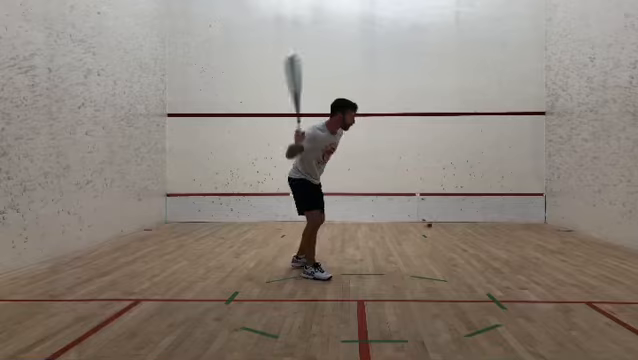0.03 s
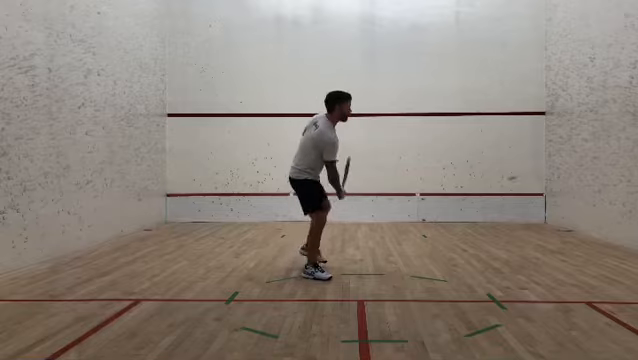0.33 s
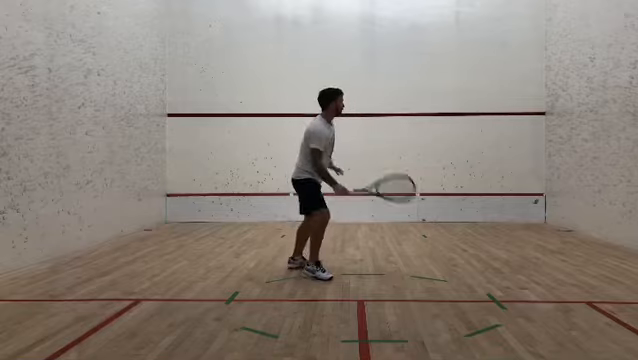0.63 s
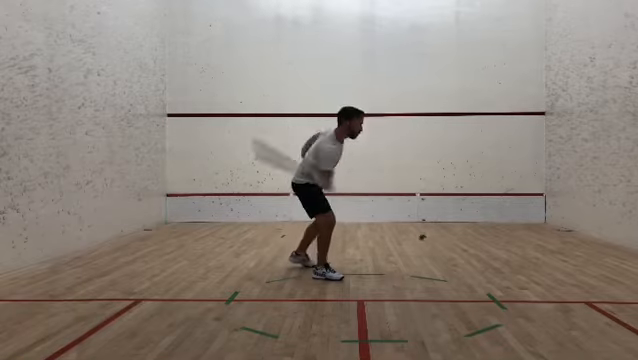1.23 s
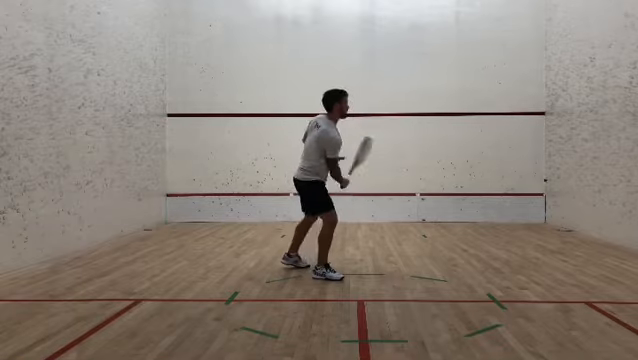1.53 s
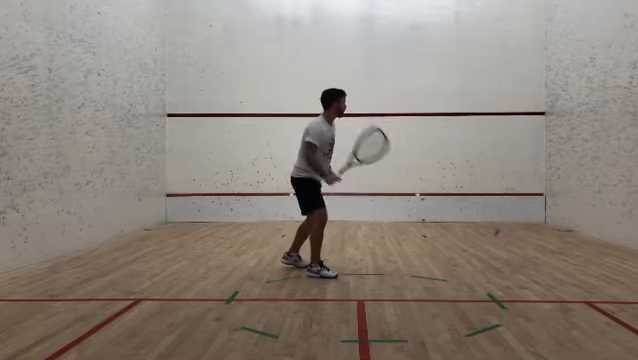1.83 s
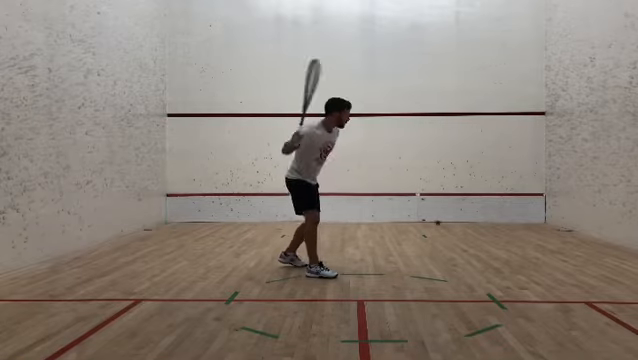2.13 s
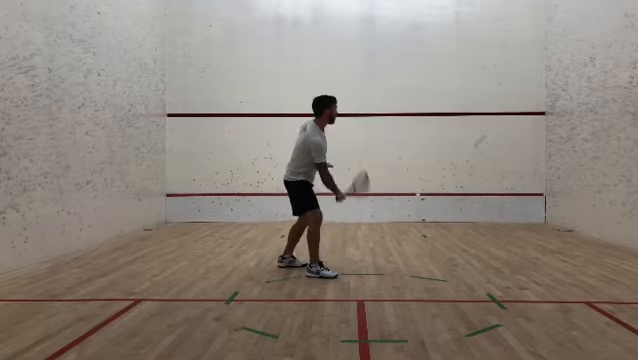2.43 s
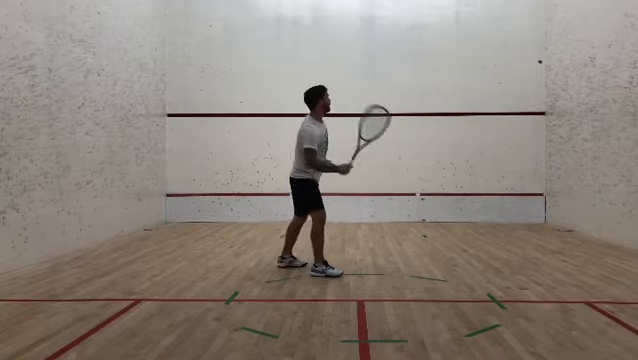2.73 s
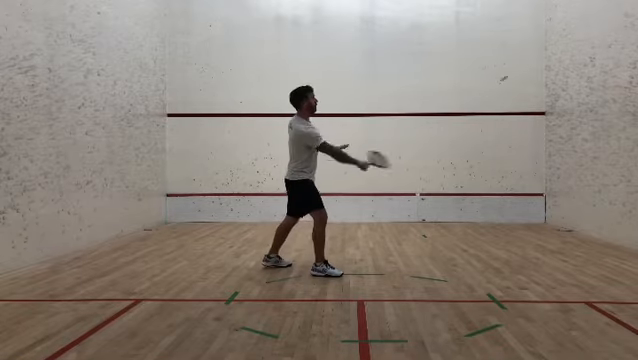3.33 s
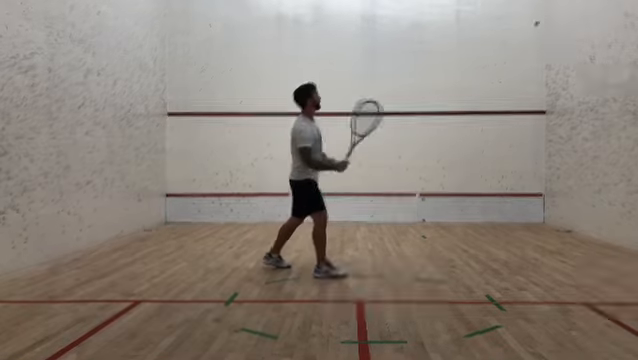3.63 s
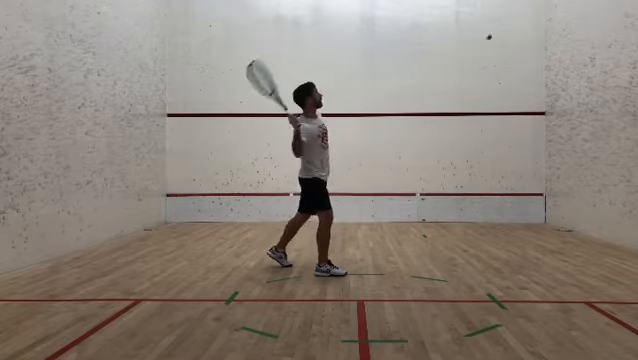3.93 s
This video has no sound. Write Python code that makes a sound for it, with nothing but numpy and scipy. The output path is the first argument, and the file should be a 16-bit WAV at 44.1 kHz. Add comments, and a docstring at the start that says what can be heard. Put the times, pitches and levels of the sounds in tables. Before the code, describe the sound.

A squash ball is struck and slaps the wall about once a second, echoing loudly.

```python
"""Solo squash in a bare court

Heard from the back, the strings crack against the hollow ball and ring briefly. About a sixth of a
second later the ball slaps the front wall. Hard side walls and ceiling throw back echoes that thicken
into a long, darkening tail. The springy floor thuds between strokes, over a low ventilation rumble."""
import sys
import numpy as np
from scipy import signal
from scipy.fft import rfft, irfft
from scipy.io import wavfile

SR = 44100
rng = np.random.default_rng(int(sys.argv[2]) if len(sys.argv) > 2 else 0)


def generate_wav(sig):
    """Save sig (samples, or channels by samples) to the path in sys.argv[1] as 16-bit PCM at SR."""
    pcm = np.round(np.clip(np.atleast_2d(sig).T, -1, 1) * 32767).astype(np.int16)
    wavfile.write(sys.argv[1], SR, pcm)


N = 176400
GAP_S = .004  # wait before a stroke or thud starts to ring on

# racket strokes: t/s, level/dB, treble/dB, string ring/dB
STROKES = [(.0493, .8, -.7, 0), (1.1534, .7, -1, 6), (2.1973, -2, .6, -3), (3.0833, -1.7, 1.6, 3),
           (3.9953, -.5, 0, 0)]
# tone of the crack: f/Hz, level/dB
CRACK_TONE = [(30, -30), (150, -12), (500, -9), (1500, -6), (2500, -6), (4200, -2), (7000, -1), (10000, -4),
              (15000, -14)]
# notes of the strings: f/Hz, level/dB, time to fade 60 dB/s
STRING_NOTES = [(1020, 0, .8), (1125, -2, .4), (1285, -6, .3), (1610, -3, .35), (4250, -17, .25)]
# first echoes of a stroke: delay/s, level/dB
RACKET_ECHOES = [(.0102, -8), (.0119, -5), (.0295, -9), (.0345, -9), (.046, -12)]
# tone of the court's answer to a stroke: f/Hz, level/dB
RACKET_TAIL = [(30, -44), (58, -14), (120, -10.5), (220, -7), (380, -5), (560, -7.5), (820, -5.5),
               (1020, -1), (1250, -9.5), (1550, -6), (1950, -16), (3600, -18.3), (7500, -22.3),
               (10500, -26.5), (15000, -37)]


def racket(level_db=-6.5, pock_hz=860, scatter=.13):
    """The strings crack and ring on, and the hollow ball goes 'pock'. Each echo sounds a bit different."""
    out, t, ring_t = np.zeros(N), clock(.03), clock(.6)
    for s, db, treble_db, ring_db in STROKES:
        for delay, echo_db in [(0, 0)] + RACKET_ECHOES:
            crack = amp(treble_db - 9) * noise(CRACK_TONE, t) * swell(t, peak_s=.0014, sharp=1.1)
            detune = np.exp(scatter * rng.normal())
            pock = amp(1.5) * sine(pock_hz * detune, t) * swell(t, peak_s=.004, sharp=11)
            push = push_of_air(t, at_s=.0045, width_s=.00055, db=-5)
            add(out, s + delay, amp(level_db + db + echo_db) * (crack + pock + push))
        ring = sum(amp(note_db + rng.normal(0, 2) - 60 * ring_t / fade_s) * sine(hz, ring_t)
                   for hz, note_db, fade_s in STRING_NOTES)
        add(out, s + GAP_S, amp(db + ring_db - 26) * ring)
        add(out, s + GAP_S, amp(db) * court_tail(shaded(RACKET_TAIL, treble_db, boom_db=0)))
    return out


# wall hits (the first leaves only its tail):
# t/s, level/dB, treble/dB, knock f/Hz, pop f/Hz, pop/dB, court boom/dB
WALL_HITS = [(-.85, -1, 0, 1900, 740, 0, 0), (.1993, .5, .3, 2000, 740, -5, .5),
             (1.3052, .7, -.8, 1900, 790, -2, 1.8), (2.3599, -1, .6, 1700, 780, 1, -1.5),
             (3.2543, -1.5, 1.1, 1480, 730, -2, -1)]
# tone of the slap: f/Hz, level/dB
SLAP_TONE = [(30, -30), (150, -10), (400, -2), (1000, -3), (1600, 5), (2900, 4.5), (4000, 0), (5500, -1),
             (9000, -4), (15000, -14)]
# first echoes of a wall hit: delay/s, level/dB
WALL_ECHOES = [(.0095, -10), (.0118, -2), (.0265, -7), (.0565, -6.5), (.0605, -4.5), (.116, -11)]
# tone of the court's answer to a wall hit: f/Hz, level/dB
WALL_TAIL = [(45, -42), (120, -14.3), (220, -5.3), (290, -5.5), (380, -2), (490, -2.5), (610, -6), (720, 2),
             (860, 2), (1020, -8), (1200, -12.3), (1470, -4), (1700, -6.2), (1950, -5.7), (2600, -12.3),
             (3600, -15.3), (5200, -16), (7500, -17.7), (10500, -20), (13000, -24), (16000, -33)]


def front_wall(level_db=-5.5, direct_db=1.8, scatter=.1, tail_gap_s=.008):
    """The ball slaps and knocks as it is squashed flat, then gives a lower pop as it springs back."""
    out, t = np.zeros(N), clock(.03)
    for s, db, treble_db, knock_hz, pop_hz, pop_db, boom_db in WALL_HITS:
        for delay, echo_db in [(0, direct_db)] + WALL_ECHOES:
            slap = amp(treble_db - 4.8) * noise(SLAP_TONE, t) * swell(t, peak_s=.0006, sharp=.55)
            detune = np.exp(scatter * rng.normal())
            knock = amp(-1) * sine(knock_hz * detune, t) * swell(t, peak_s=.0011, sharp=1.6)
            pop = sine(pop_hz * detune, t) * swell(t, peak_s=.0035, sharp=4)
            pop += push_of_air(t, at_s=.003, width_s=.00045, db=-6)
            add(out, s + delay, amp(level_db + db + echo_db) * (slap + knock + amp(pop_db) * pop))
        add(out, s + tail_gap_s, amp(db) * court_tail(shaded(WALL_TAIL, treble_db, boom_db)))
    return out


def push_of_air(t, at_s, width_s, db):
    """One swing of air pressure from the ball being flattened."""
    u = (t - at_s) / width_s
    return amp(db) * u * np.exp(-u * u / 2)


# thuds on the floor: t/s, level/dB, tick/dB
THUDS = [(.648, -4, -15), (1.765, -8, -40), (2.775, -11, -40), (3.455, -6, -40)]
# tone of the floorboards: f/Hz, level/dB
BOARD_TONE = [(25, -25), (55, -2), (110, 0), (180, -8), (400, -16), (1500, -30), (8000, -60)]


def floor_thuds(level_db=-18, tail_db=-9):
    """Ball and feet thump the springy boards, with a faint tick as they land."""
    out, t = np.zeros(N), clock(.2)
    for s, db, tick_db in THUDS:
        boards = amp(-10) * noise(BOARD_TONE, t) * swell(t, peak_s=.012, sharp=1.1)
        tick = amp(tick_db) * noise(CRACK_TONE, t) * swell(t, peak_s=.0005, sharp=.8)
        add(out, s, amp(level_db + db) * (boards + tick))
        add(out, s + GAP_S, amp(tail_db + db) * court_tail(BOARD_TONE))
    return out


# how long the court rings: f/Hz, time to fade 60 dB/s
FADE_TIMES = [(60, 2.3), (220, 2.2), (380, 3.2), (800, 2.5), (1800, 2.55), (2600, 2.25), (3600, 1.95),
              (5200, 1.5), (7500, 1.05), (10500, .73), (15000, .48)]
# how fast its tail builds up: f/Hz, rise time/s
RISE_TIMES = [(100, .016), (800, .021), (2000, .02), (5000, .008)]


def court_tail(tone, first_echoes_per_s=2000, thicken_s=.05):
    """Echoes crowd ever closer and blur into a tail. The treble arrives first and dies first."""
    t = clock(2.6)
    chance = np.minimum(first_echoes_per_s * (1 + (t / thicken_s) ** 2) / SR, 1)
    echoes = rng.choice([-1, 1], len(t)) * (rng.random(len(t)) < chance) / np.sqrt(chance)
    hz, s, bands = signal.stft(echoes, SR, nperseg=256)  # split by pitch
    rise = 1 - np.exp(-s / along(RISE_TIMES, hz)[:, None])
    fade = amp(-60 * s / along(FADE_TIMES, hz)[:, None])
    tail = signal.istft(bands * rise * fade, SR, nperseg=256)[1]
    return coloured(tail, tone)


def shaded(tone, treble_db, boom_db):
    """Give a tail's tone the brightness and hollow boom of one hit."""
    treble = [(1500, 0), (3000, 1)]  # f/Hz, share of the boost
    boom = [(500, 0), (700, 1), (900, 1), (1200, 0)]
    return [(hz, db + treble_db * along(treble, hz) + boom_db * along(boom, hz)) for hz, db in tone]


# tone of the ventilation: f/Hz, level/dB
RUMBLE_TONE = [(20, -32), (38, -20), (56, 1.5), (100, -6), (200, -7), (360, 1), (560, -4), (800, -2),
               (1200, -15), (2000, -15), (5000, -35), (9000, -44), (15000, -51)]


def ventilation(level_db=-43):
    """Moving air makes a low, steady rumble."""
    return amp(level_db) * noise(RUMBLE_TONE, np.arange(N))


def amp(db):
    """Turn decibels into a multiplier."""
    return 10 ** (np.asarray(db) / 20)


def along(points, hz):
    """Read between the rows of a (f/Hz, value) table, with octaves evenly spaced."""
    f, values = np.transpose(points)
    return np.interp(np.log(hz + 1), np.log(f + 1), values)


def clock(s):
    """The time of each sample in s seconds."""
    return np.arange(int(s * SR)) / SR


def sine(hz, t):
    """A pure note."""
    return np.sin(2 * np.pi * hz * t)


def add(track, s, x):
    """Mix x in at s seconds, dropping what falls outside the track."""
    i = round(s * SR)
    x, i = x[max(-i, 0):], max(i, 0)
    track[i:i + len(x)] += x[:max(len(track) - i, 0)]


def coloured(x, tone, size=4096):
    """Turn the lows and highs of x up or down to follow a tone table."""
    log_gain = np.log(amp(along(tone, np.fft.rfftfreq(size, 1 / SR))))
    folded = irfft(log_gain)
    folded[1:size // 2] *= 2  # fold so the filter rings only after a hit, never before
    folded[size // 2 + 1:] = 0
    response = irfft(np.exp(rfft(folded)))
    return signal.fftconvolve(x, response)[:len(x)]


def noise(tone, t):
    """Noise with the given tone and a typical size (rms) of 1."""
    x = coloured(rng.standard_normal(len(t)), tone)
    return x / x.std()


def swell(t, peak_s, sharp):
    """A contact that rises to 1 at its peak and lets go."""
    u = np.maximum(t, 0) / peak_s
    return (u * np.exp(1 - u)) ** sharp


def scene():
    """Strokes, wall hits and thuds over the ventilation, in one channel."""
    return (racket() + front_wall() + floor_thuds() + ventilation())[None]


def record(dry, start_s=.036, ceiling=.9, top_hz=15900):
    """The microphone opens, rounds off the tallest peaks and cuts the highest treble."""
    opened = dry * (np.arange(N) > start_s * SR)
    rounded = opened / (1 + np.abs(opened / ceiling) ** 6) ** (1 / 6)
    treble_cut = signal.firwin(161, top_hz, window=("kaiser", 9), fs=SR)
    return signal.fftconvolve(rounded, treble_cut[None], "same")


dry = scene()
out = record(dry)
generate_wav(out)
```